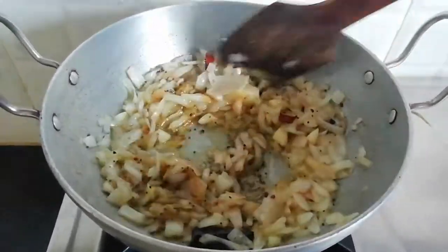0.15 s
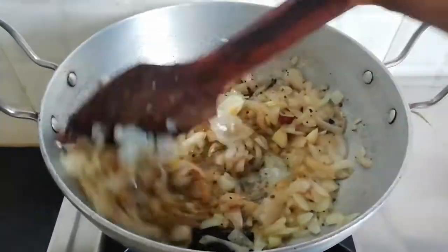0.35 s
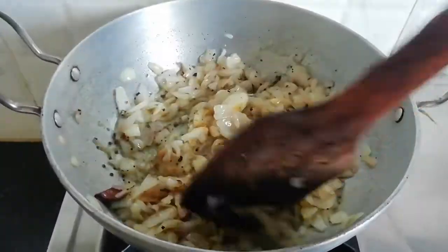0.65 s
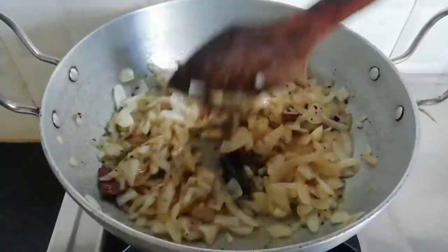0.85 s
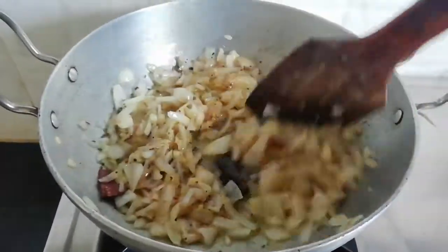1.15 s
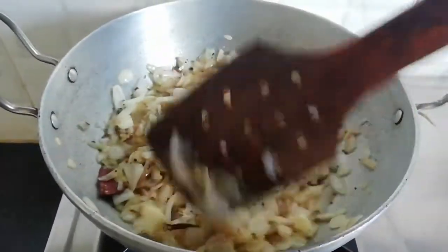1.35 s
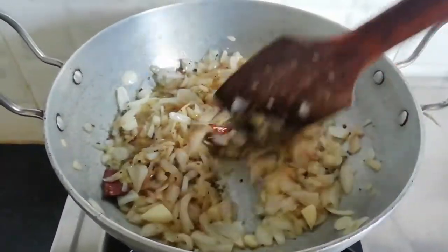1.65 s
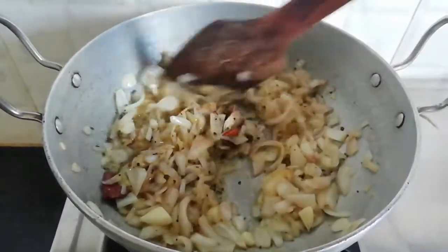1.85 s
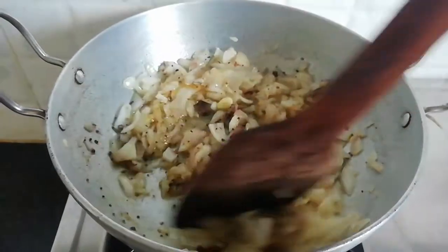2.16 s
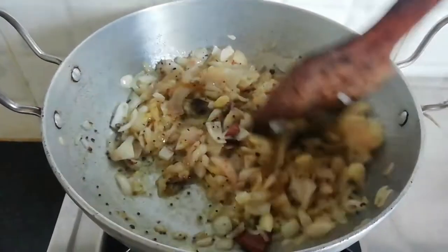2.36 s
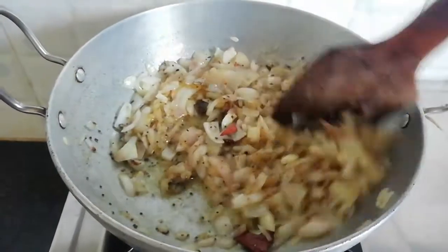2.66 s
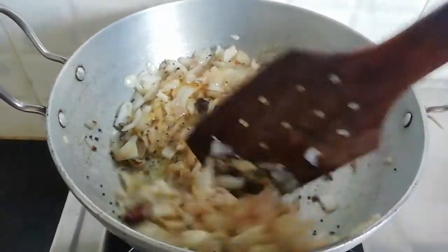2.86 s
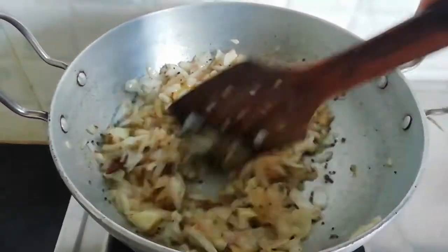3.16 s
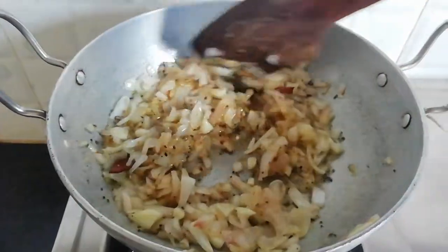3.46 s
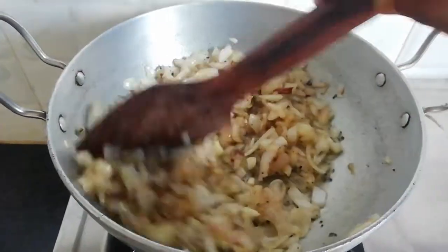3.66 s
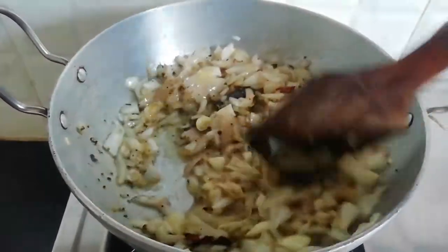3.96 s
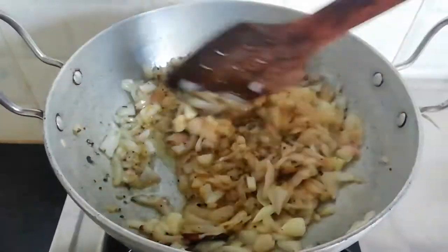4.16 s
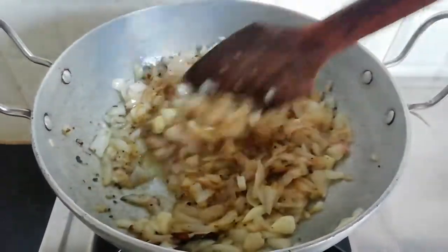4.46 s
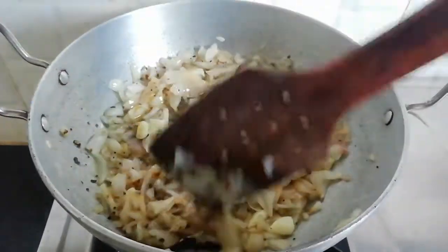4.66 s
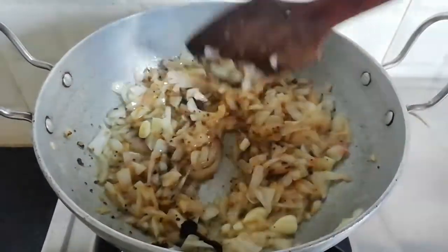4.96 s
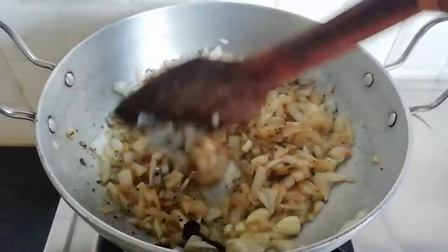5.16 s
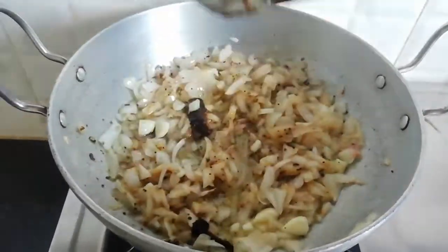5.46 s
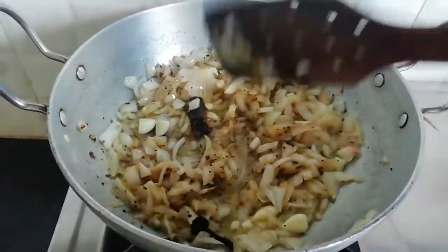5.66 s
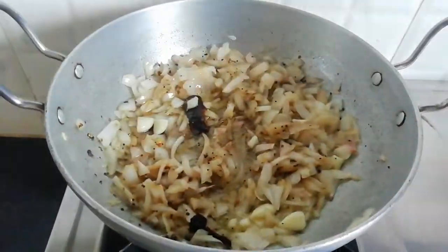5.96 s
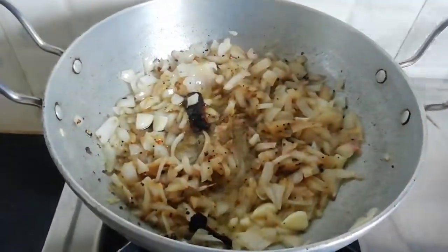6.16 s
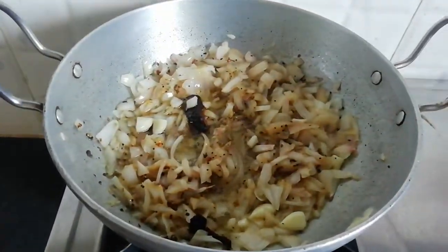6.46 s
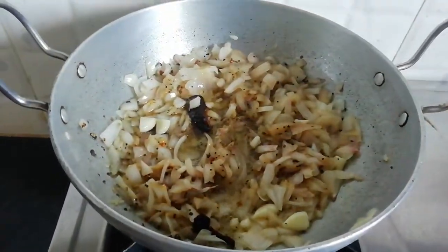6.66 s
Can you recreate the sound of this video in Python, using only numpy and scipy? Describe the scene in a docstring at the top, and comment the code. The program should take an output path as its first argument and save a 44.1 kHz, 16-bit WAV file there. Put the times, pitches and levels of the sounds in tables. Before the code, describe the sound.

Bright, crackling onion frying, heard from close above in stereo with a short hard-walled kitchen echo. Brisk wooden strokes scrape and rub the metal, making brief squeaks, low hollow thumps and wet slithering, with small sharp oil ticks between. The sizzle thins as the stirring stops. Then comes one startling sharp pop, far louder than everything else, and finally several clustered wooden knocks over the quieter frying.

```python
"""In a tiled kitchen, heard from close above: chopped onions fry in oil in a deep metal pan on a gas stove.
Tiny steam bursts make the sizzle, and filtered noise the murmur of the flame under it.
A wooden spatula turns the heap: its strokes make the pan judder, and wet faces on hot metal swell the sizzle.
The stirring stops, one drop of oil spits loudly, and the spatula is put down with a short run of knocks."""
import sys
import numpy as np
from scipy import signal
from scipy.fft import rfft, irfft, next_fast_len
from scipy.io import wavfile
from scipy.ndimage import uniform_filter1d

SR = 44100
rng = np.random.default_rng(int(sys.argv[2]) if len(sys.argv) > 2 else 0)


def wav_out(sig):
    """Save sig, one row per channel (or a flat mono array), as 16-bit PCM at SR to the path in sys.argv[1]."""
    wavfile.write(sys.argv[1], SR, np.round(np.clip(np.atleast_2d(sig).T, -1, 1) * 32767).astype(np.int16))


N = 299871
TIME = np.arange(N) / SR
SIZE = next_fast_len(N + SR // 2, real=True)   # transform length, with room for tails
BINS = np.maximum(np.fft.rfftfreq(SIZE, 1 / SR), 1)   # Hz


def from_db(db):
    """Turn decibels into gain."""
    return np.exp(np.asarray(db) * (np.log(10) / 20))


def rms_one(x):
    """Scale to an rms of 1."""
    return x / np.sqrt(np.mean(x ** 2) + 1e-20)


def over_hz(points):
    """Join (Hz, value) points on a log-frequency axis."""
    hz, value = np.transpose(points)
    return np.interp(np.log(BINS), np.log(hz), value)


def bumps(resonances):
    """Add up the dB curve of peaks and dips, each as wide as stated at half its dB."""
    return sum(db / (1 + (2 * (BINS - hz) / width) ** 2) for hz, width, db in resonances)


def colour(x, curve_db):
    """Filter causally (minimum phase) with this dB curve, by folding its cepstrum."""
    cepstrum = irfft(np.log(from_db(curve_db)), SIZE)
    cepstrum[1:SIZE // 2] *= 2
    cepstrum[SIZE // 2 + 1:] = 0
    response = np.exp(rfft(cepstrum))
    return irfft(rfft(x, SIZE) * response, SIZE)[..., :N]


def shaped(x, spectrum):
    """Give a white signal a spectrum and keep its power."""
    curve = over_hz(spectrum)
    mean_power_db = 10 * np.log10(np.mean(from_db(curve) ** 2))
    return colour(x, curve - mean_power_db)


def drift(cutoff_hz):
    """Smooth random wander with an rms of 1."""
    spectrum = rfft(rng.standard_normal(SIZE))
    return rms_one(irfft(spectrum / (1 + (BINS / cutoff_hz) ** 2), SIZE)[:N])


def ring(x, hz, t60):
    """Resonate: a unit click sets a sine of height 1 ringing, down 60 dB after t60 seconds."""
    r = from_db(-60 / (t60 * SR))
    w = 2 * np.pi * hz / SR
    return signal.lfilter([0, np.sin(w)], [1, -2 * r * np.cos(w), r * r], x + 1e-18)


def swell(start, hold, attack, t60):
    """An envelope in seconds that rises to 1, holds and dies away."""
    span = slice(*np.searchsorted(TIME, [start, start + attack + hold + 2 * t60]))
    age = TIME[span] - start
    rise = np.minimum(age / attack, 1)
    out = np.zeros(N)
    out[span] = rise * np.exp(-np.log(1000) * np.maximum(age - attack - hold, 0) / t60)
    return out


def dying(start, t60):
    """An envelope that jumps to 1 within a sample and dies away."""
    return swell(start, 0, 1 / SR, t60)


def bursts(per_s, spread_db, scatter_s=.002, count=3):
    """Random clicks of uneven size; each reaches the two ports by a few paths round the bowl."""
    born = rng.random(N) < per_s / SR
    at = np.flatnonzero(born)
    sizes = from_db(spread_db * np.minimum(rng.exponential(1, at.size), 4.5))
    out = np.zeros((2, N))
    for port in out:
        for path in range(count):
            lag = (rng.random(at.size) * scatter_s * path * SR).astype(int)
            sign = rng.choice([-1, 1], at.size)
            port += np.bincount(at + lag, sizes * sign, N)[:N]
    return out


def bubbles(per_s, cycles, spread_db, size=800):
    """Small steam bubbles ring, each at the pitch of its size, and unevenly at the two ports."""
    at = np.flatnonzero(rng.random(N) < per_s / SR)
    pitch, strength, *ports = rng.random((4, at.size, 1))
    hz = 1500 * (15000 / 1500) ** pitch
    age = np.arange(size) / SR
    height = hz * from_db(spread_db * np.minimum(-np.log(1 - strength), 4))
    # down 60 dB after so many cycles, and faded out by the last sample
    fade = np.exp(-np.log(1000) * age * hz / cycles) * np.linspace(1, 0, size)
    tones = height * fade * np.sin(2 * np.pi * hz * age)
    where = (at[:, None] + np.arange(size)).ravel()
    heard = [np.bincount(where, (np.cos(2 * np.pi * port) * tones).ravel(), N)[:N] for port in ports]
    return rms_one(np.array(heard))


def flame():
    """The gas ring murmurs under the pan: noise with low humps."""
    # Each row: frequency in Hz, relative density in dB.
    murmur = [(20, -3), (45, 6), (66, 14), (100, 6), (140, 7.5), (230, 5.5), (280, -65), (340, 10),
              (400, -26), (480, 11.5), (700, -35), (2000, -40)]
    return from_db(-63.0) * shaped(rng.standard_normal((2, N)), murmur)


def stirring():
    """Drive sizzle, tumbling and swish: every push adds its power to that of the resting pan."""
    # Sizzle of the onions left lying, sinking as their undersides dry.
    # Each row: time in seconds, relative level in dB.
    resting_sizzle = [(0, -36), (1.3, -36), (4.2, -36.5), (5.3, -40), (6.8, -42)]
    # Pushes of the spatula through the heap. Each row: start in seconds, hold in seconds, then relative
    # levels in dB of fresh sizzle, wet tumbling, and swish over the metal.
    pushes = [(-0.1, 0.31, -38, -50, -49), (0.168, 0.15, -37, -43.5, -47.5), (0.535, .17, -32, -42, -43),
              (1.026, 0.047, -31, -38.5, -36.5), (1.335, .06, -38, -46, -48),
              (1.492, 0.054, -31.5, -44, -40.5), (1.618, 0.043, -34.5, -61, -34.5),
              (1.75, 0.13, -34.5, -43.5, -45.5), (1.917, .19, -36.5, -61, -43.5),
              (2.175, 0.073, -37.5, -40, -59), (2.515, .08, -34.5, -46, -42.5),
              (2.612, 0.024, -36, -42.5, -44), (2.717, 0.14, -36, -45, -46.5),
              (2.936, 0.14, -30.5, -44, -47), (3.088, .18, -38, -50, -47.5), (3.434, 0.22, -35, -46, -44.5),
              (3.693, 0.062, -32, -60, -41.5), (3.803, 0.14, -31, -41.5, -42),
              (4.326, 0.087, -36.5, -39.5, -42), (4.585, 0.0065, -38, -58, -46.5),
              (4.679, 0.088, -33, -42.5, -40.5), (4.978, 0.16, -38, -48.5, -47.5),
              (5.666, 0.1, -43.5, -54, -62)]
    rest_squelch_db, rest_swish_db = -10.5, -13   # the lying slices settle a little, relative to their sizzle
    push_attack_s, push_t60_s = 0.088, 0.36
    # wet faces land on the metal a moment into each push
    flare_delay_s, flare_attack_s, flare_t60_s = .05, 0.039, .5

    resting = from_db(np.interp(TIME, *np.transpose(resting_sizzle)))
    power = (from_db([[0], [rest_squelch_db], [rest_swish_db]]) * resting) ** 2
    for start, hold, sizzle_db, squelch_db, swish_db in pushes:
        motion = swell(start, hold, push_attack_s, push_t60_s)
        flare = swell(start + flare_delay_s, hold, flare_attack_s, flare_t60_s)
        power[0] += (from_db(sizzle_db) * flare) ** 2
        power[1] += (from_db(squelch_db) * motion) ** 2
        power[2] += (from_db(swish_db) * motion) ** 2
    return 10 * np.log10(power)


def sizzle(level_db, per_s=6000, spread_db=1.0, flutter_db=1.5):
    """Water flashes to steam in thousands of tiny bursts; the livelier the pan, the more of them."""
    # Each row: frequency in Hz, relative density in dB.
    spectrum = [(150, -12.5), (400, -21.5), (700, -9.5), (900, -1.5), (1800, -8.5), (3000, -5.5),
                (4300, -4.5), (5200, -0.5), (6500, 3), (7600, 4.5), (8500, 5), (11000, -5), (14000, -9.5),
                (15300, -11)]
    vigour = from_db(level_db - np.mean(level_db))
    # the root evens out the power, so that vigour sets the density alone
    fizz = rms_one(bursts(per_s * vigour, spread_db) / np.sqrt(vigour))
    crackle = from_db(-8) * bubbles(per_s=900, cycles=153, spread_db=2.5)
    level = from_db(level_db + flutter_db * drift(25) - 4.5)
    return shaped((fizz + crackle) * level, spectrum)


def sliding(level_db, spectrum, per_s, flutter_db, spread_db=1.0):
    """Wet slices catch and let go in many tiny contacts, whose level flutters."""
    contacts = rms_one(bursts(per_s, spread_db))
    return shaped(contacts * from_db(level_db + flutter_db * drift(37)), spectrum)


def squelch(level_db):
    """The wet slices tumble over each other."""
    # Each row: frequency in Hz, relative density in dB.
    wet_spectrum = [(200, -19.5), (400, -14), (700, -10.5), (900, -6.5), (1300, 1), (2000, -3.5),
                    (2800, -8.5), (4300, -16), (9000, -16.5)]
    return sliding(level_db, wet_spectrum, per_s=2500, flutter_db=1.5)


def swish(level_db):
    """The slices swish over the metal in finer, brighter contacts."""
    # Each row: frequency in Hz, relative density in dB.
    metal_spectrum = [(900, -25.5), (1800, -7), (2550, 1), (3300, -1.5), (4300, -0.5), (6000, -7.5),
                      (9000, -23.5), (14000, -27)]
    return sliding(level_db, metal_spectrum, per_s=6000, flutter_db=3.0)


def spits(sizzle_db, tick_t60=0.0068, splutter_t60=0.042, splutter_db=-11):
    """Sharp ticks with a brief splutter: drops burst in the oil, many small ones at random."""
    # Single sharp ticks: drops bursting in the oil, and at 3.924 the spatula's contact tick.
    # Each row: time in seconds, relative level in dB.
    single_ticks = [(0.223, -27), (0.5137, -34), (0.96, -29), (1.8711, -25), (2.5643, -19.5), (2.58, -23),
                    (3.0838, -24), (3.924, -20.5), (4.227, -36), (4.6094, -30), (5.8112, -40), (5.898, -35)]
    # Each row: frequency in Hz, relative density in dB.
    spectrum = [(300, -17.5), (1000, -3), (3000, -7), (5500, 1), (8500, 4), (11000, -2.5), (15000, -0.5)]
    ticks_per_s, tick_db, tick_spread_db = 40, -5.5, 1   # small drops, relative to the sizzle
    born = rng.random(N) < ticks_per_s / SR
    uneven_db = tick_spread_db * np.minimum(rng.exponential(1, N), np.pi)
    ticks = born * from_db(sizzle_db + tick_db + uneven_db)
    for s, db in single_ticks:
        ticks[int(s * SR)] += from_db(db)
    shape = (dying(0, tick_t60) + from_db(splutter_db) * dying(0, splutter_t60))[:SR // 10]
    envelope = signal.oaconvolve(ticks, shape)[:N]
    return shaped(envelope * rng.standard_normal((2, N)), spectrum)


def squeaks():
    """The rubbing edge briefly sings: stick and slip lock on to one rough pitch for a moment."""
    # Each row: middle in seconds, length in seconds, frequency in Hz, width in Hz, relative level in dB.
    moments = [(.27, 0.07, 1180, 55, -44), (0.5, 0.21, 1290, 72, -49.5), (0.75, 0.18, 1130, 400, -43.5),
               (1.168, 0.09, 3180, 140, -48.5), (1.573, 0.054, 1300, 47, -44.5),
               (1.66, 0.13, 2080, 110, -46), (2.0, 0.027, 3240, 290, -41.5), (1.985, 0.098, 671, 9.8, -54),
               (2.68, 0.27, 2870, 110, -51), (3.103, 0.063, 5500, 250, -46), (4.043, 0.088, 1990, 190, -43),
               (4.422, 0.028, 4900, 220, -42.5), (6.408, 0.033, 2540, 480, -38),
               (6.567, 0.018, 1890, 250, -35.5), (6.707, 0.076, 553, 300, -47.5)]
    out, friction = np.zeros((2, N)), rng.standard_normal((2, N))
    for s, length, hz, width, db in moments:
        tone = rms_one(ring(friction, hz, np.log(1000) / (np.pi * width)))
        bell = np.exp(-np.minimum(2 * ((TIME - s) / length) ** 2, 20))
        out += from_db(db + 3.0) * bell * tone
    return out


def kitchen(x, wet_db, t60=0.38):
    """Add the diffuse echo of tiled walls, different at each port."""
    tail = (rng.standard_normal((2, N)) * dying(0.0036, t60))[:, :SR // 2]
    tail /= np.sqrt(np.sum(tail ** 2, axis=1, keepdims=True))
    return x + from_db(wet_db) * signal.fftconvolve(x, tail, axes=1)[:, :N]


def pan(force):
    """The modes of the pan on its stand answer a force, with alternating signs."""
    # Each row: frequency in Hz, relative level in dB, ring time to -60 dB in seconds.
    modes = [(68, -33, 0.24), (113, -15, 0.068), (159.6, -12, 0.36), (221, 7, 0.036), (238, 4, 0.27),
             (281, -2, 0.057), (324.2, -8.5, 0.31), (342, -10, 0.092), (400, -29, 0.098), (481, -14, 0.12),
             (682, -10, 0.14)]
    return sum((-1) ** k * from_db(db) * ring(force, hz, t60) for k, (hz, db, t60) in enumerate(modes))


def spatula(port_lag_s=0.00047, lock_t60=0.14, press_s=0.018, blade_db=-4):
    """Wood sticks and slips along the metal and knocks against it; both shake the pan."""
    # The wooden edge catches and drags on the metal.
    # Each row: start in seconds, hold in seconds, relative judder in dB, stick-slip rate in Hz.
    drags = [(0.536, .024, -43, 225), (0.613, 0.024, -32, 277), (0.683, 0.022, -34, 252),
             (0.827, 0.014, -42.5, 246), (0.88, 0.075, -48, 228), (1.016, .022, -37.5, 234),
             (1.086, .04, -48, 302), (1.362, .035, -49, 234), (1.463, 0.025, -36, 243),
             (1.91, 0.048, -39.5, 250), (2.025, 0.017, -46, 238), (2.67, .076, -45.5, 245),
             (2.92, .045, -35, 233.4), (3.047, .03, -41.5, 239), (3.492, .094, -46.5, 229),
             (3.893, 0.0044, -35.5, 260), (3.954, 0.044, -33.5, 232.5), (4.718, 0.056, -38.5, 231),
             (4.823, 0.069, -49, 248), (6.376, 0.04, -30, 246), (6.493, 0.048, -37.5, 263),
             (6.547, 0.031, -30.5, 259), (6.67, .04, -47, 248)]
    # Blows. Each row: time in seconds, then relative levels in dB of the thump of the pan,
    # the dull thock, and the bright clack of bare wood.
    knocks = [(0.623, -24, -25.5, -40), (0.721, -21, -23.5, -29), (1.021, -45, -30.5, -45),
              (1.933, -21, -36, -42), (2.918, -21.5, -47, -38), (3.514, -49, -37, -51),
              (3.923, -20.5, -45, -27), (3.976, -19.5, -35, -28), (4.75, -31, -34, -38),
              (5.972, -47, -51, -32), (6.383, -31, -35.5, -34), (6.396, -20, -28, -31),
              (6.507, -37, -34, -36), (6.564, -12.5, -28.5, -23), (6.685, -46, -37, -37.5),
              (6.763, -36, -45, -30)]
    # Both spectra, each row: frequency in Hz, relative density in dB.
    thock_spectrum = [(60, -14.5), (300, 4), (480, 4), (620, -7.5), (950, 1), (1300, 1), (1700, -11),
                      (3000, -20), (8000, -28)]
    clack_spectrum = [(500, -8), (1200, -8), (1800, -2), (2700, 2), (3500, -2.5), (5000, -10), (8500, -5),
                      (14000, -22)]
    drag_attack_s, drag_t60_s = 0.039, 0.16
    knock_t60_s, press_t60_s = 0.11, 0.034

    slips, grit = bursts(per_s=540, spread_db=3.0)
    drag_power, locked, press, thock, clack = np.zeros((5, N))
    for start, hold, judder_db, slip_hz in drags:
        # slipping partly locks to one rate, set by how the blade is held
        effort = from_db(judder_db) * swell(start, hold, drag_attack_s, drag_t60_s)
        locked += effort * rms_one(ring(slips, slip_hz, lock_t60))
        drag_power += effort ** 2
    drag = np.sqrt(drag_power + 1e-20)
    locked /= drag
    for s, thump_db, thock_db, clack_db in knocks:
        # the blade lands on onion, so it grinds in over some milliseconds
        press += from_db(thump_db) * swell(s, 0, press_s, press_t60_s)
        blow = dying(s, knock_t60_s)
        thock += from_db(thock_db) * blow
        clack += from_db(clack_db) * blow

    # pan and blade both sound
    rub = rms_one(pan(locked + from_db(20.5) * rms_one(slips))) + from_db(blade_db) * locked
    # the judder's level is evened out, so that the drags alone set its loudness
    rub /= np.sqrt(uniform_filter1d(rub ** 2, size=1000) + 1e-9)
    thump = pan(press * grit) / np.std(pan(grit))
    shake = from_db(-2.2) * drag * rub + from_db(-12.5) * thump
    # the shaking reaches the left port later
    judder = np.array([np.interp(TIME - port_lag_s, TIME, shake), shake])

    dull_level = from_db(-4) * thock + from_db(-14.5) * drag
    dull = rms_one(bursts(per_s=2500, spread_db=2.0)) * dull_level
    bright = rms_one(bursts(per_s=2700, spread_db=0.0)) * from_db(-6.5) * clack
    wood = shaped(dull, thock_spectrum) + shaped(bright, clack_spectrum)
    return kitchen(judder, wet_db=-22.0), wood


def pop(scatter_t60=0.053, room_t60=0.96):
    """Trapped water explodes: one crack, its echoes in the bowl, then the room."""
    # The one loud spit: time in seconds, relative level in dB.
    start, level_db = (6.0655, 0.56)
    # Echoes off the pan wall and the stove, the first row being the crack itself.
    # Each row: delay in seconds, relative left level in dB, relative right level in dB.
    echoes = [(0, 0, -1), (.0008, -8, -8), (.0022, -3, -15), (.0029, -2, -15), (.0041, -9, -19),
              (.0056, -11, -20), (.0156, -19, -24), (.0164, -17, -24)]
    # Both spectra, each row: frequency in Hz, relative density in dB.
    crack_spectrum = [(300, -22), (800, -14), (1400, 4), (2500, 0), (3900, 6.5), (5800, 4.5), (7500, 8),
                      (9500, 1.5), (11200, -9), (15000, -15)]
    tail_spectrum = [(400, -41), (1200, -4.5), (2500, 3), (3600, 7), (5500, -4), (9000, -2), (14000, -37)]
    crack = np.zeros((2, N))
    for delay, left_db, right_db in echoes:
        crack[:, int((start + delay) * SR)] += from_db([left_db, right_db])
    onset = start + .002
    scatter = from_db(-18.5) * dying(onset, scatter_t60) * rng.standard_normal((2, N))
    room = from_db(-34.5) * dying(onset, room_t60) * rng.standard_normal((2, N))
    close = shaped(from_db(-1.5) * crack + scatter, crack_spectrum)
    return from_db(level_db) * (close + shaped(room, tail_spectrum))


def blend(pair):
    """Leak two unrelated channels into each other, as sound reaches both ports."""
    # Each row: frequency in Hz, left-right correlation from -1 to 1.
    likeness = [(60, 1), (250, 0.87), (450, 0.29), (650, -0.13), (900, 0.77), (1520, 0.99), (1800, 0.44),
                (2400, -0.25), (3300, 0.25), (4300, -0.37), (5400, 0.43), (7000, -0.4), (12000, 0.024)]
    angle = np.arcsin(np.clip(over_hz(likeness), -1, 1)) / 2
    both = rfft(pair, SIZE)
    return irfft(np.cos(angle) * both + np.sin(angle) * both[::-1], SIZE)[:, :N]


def scene():
    """The bowl colours frying and wood; squeaks join them in the kitchen; judder and pop come directly."""
    # Air resonances of the bowl. Each row: frequency in Hz, width in Hz, height in dB.
    bowl = [(231.2, 23, 10.5), (323.4, 23, 12.5), (908, 42, 6), (1014.4, 24, 9.5), (1070, 180, -5),
            (1167, 16, 7), (1310, 15, 2.5), (1552, 32, 9.5), (1602, 175, -6.5), (2030, 26, 3),
            (2500, 220, -3.5), (2990, 32, 1.5), (3260, 73, 3)]
    sizzle_db, squelch_db, swish_db = stirring()
    judder, wood = spatula()
    frying = sizzle(sizzle_db) + squelch(squelch_db) + swish(swish_db) + spits(sizzle_db)
    in_bowl = colour(frying + wood, bumps(bowl))
    around = kitchen(in_bowl + squeaks(), wet_db=-7) + flame()
    return blend(around) + judder + pop()


def record(dry):
    """Each microphone port adds its resonances; peaks clip and the top is cut."""
    # Resonances of the two ports. Each row: frequency in Hz, width in Hz, height in dB.
    left_port = [(930, 1080, -3.5), (1968, 326, 6.5), (2500, 130, 0.5), (4330, 750, 4), (6210, 3440, 11.5),
                 (6360, 380, 3.5), (7070, 470, 0.5), (7600, 920, -7.5), (8760, 1930, -7)]
    right_port = [(7760, 780, -9.5), (8250, 740, 3.5), (10040, 240, 6)]
    cutoff_hz = 15600
    heard = np.array([colour(dry[0], bumps(left_port)), colour(dry[1], bumps(right_port))])
    top_cut = signal.ellip(10, .1, 70, cutoff_hz, fs=SR, output="sos")
    return signal.sosfilt(top_cut, np.clip(heard, -1, 1))


dry = scene()
out = record(dry)
wav_out(out)
```